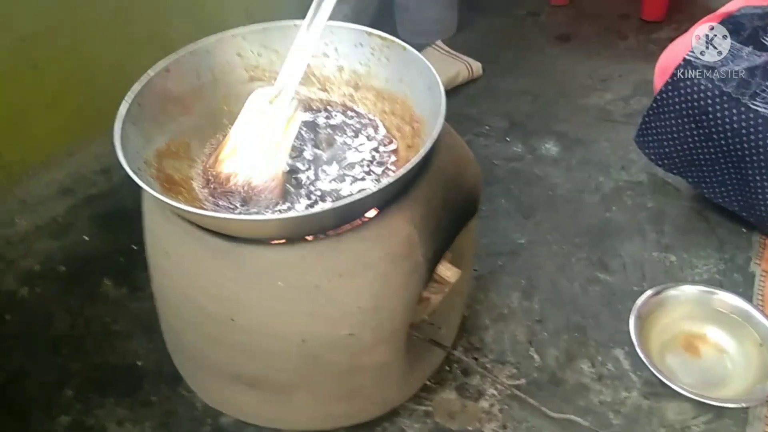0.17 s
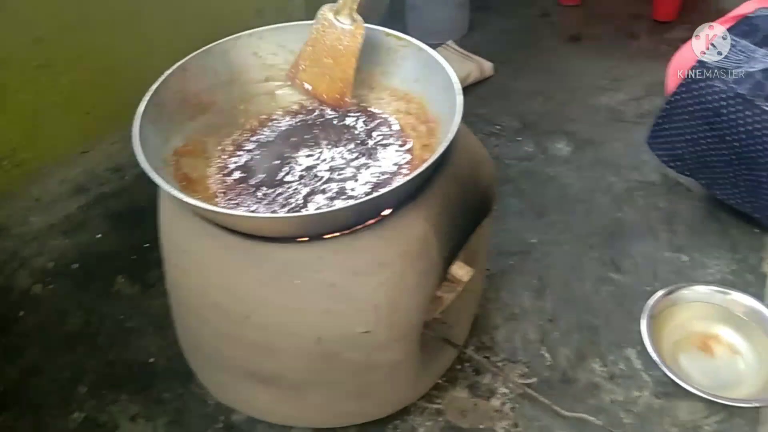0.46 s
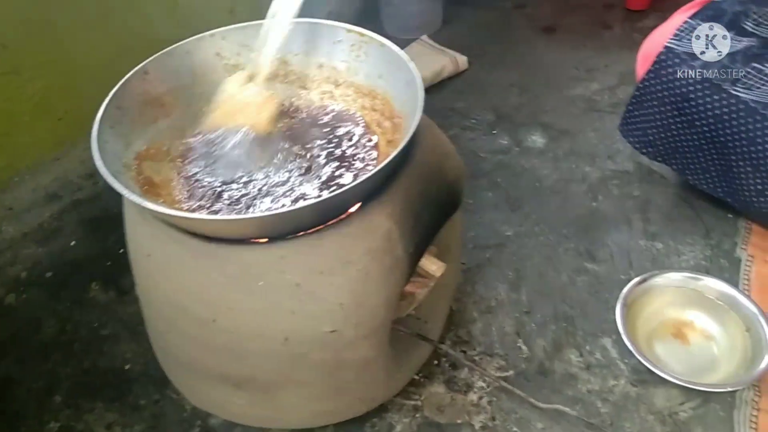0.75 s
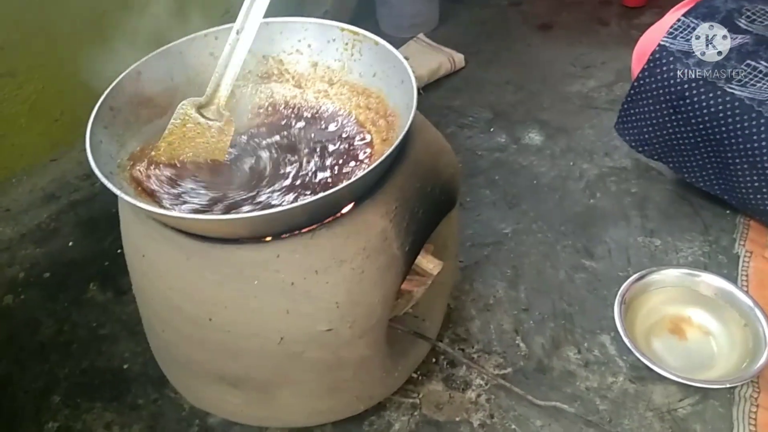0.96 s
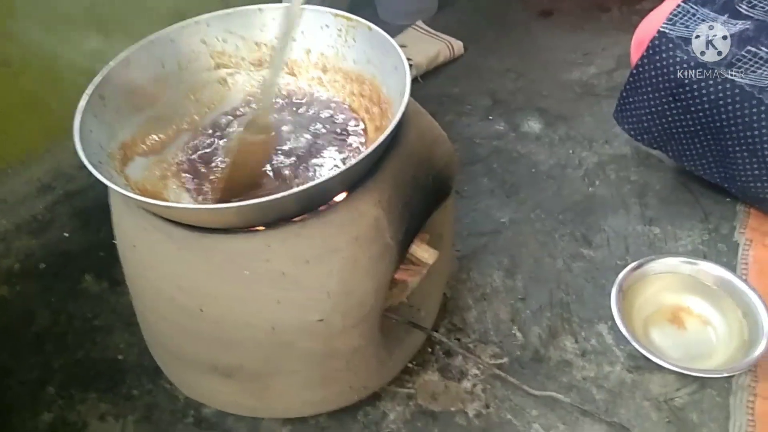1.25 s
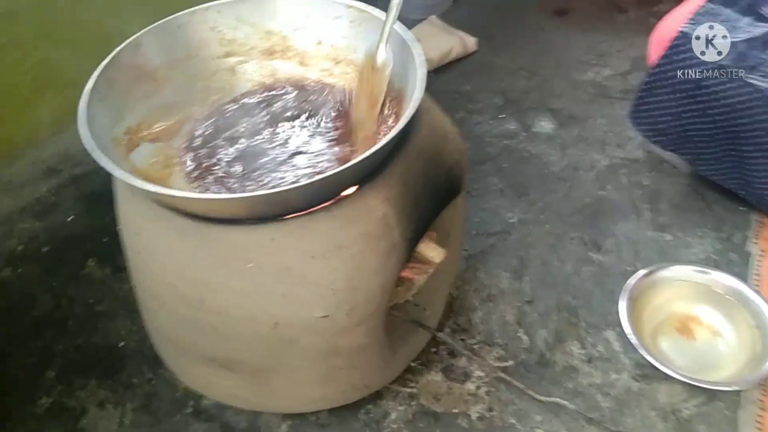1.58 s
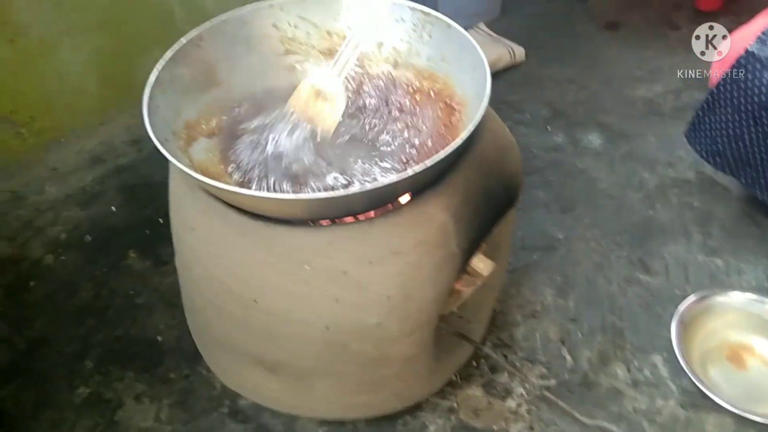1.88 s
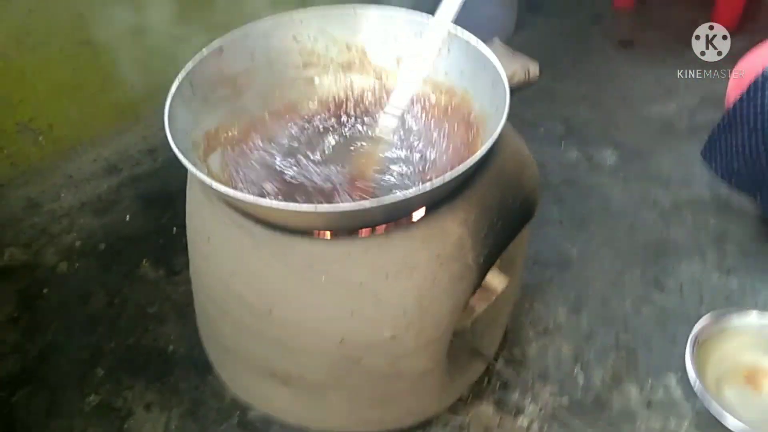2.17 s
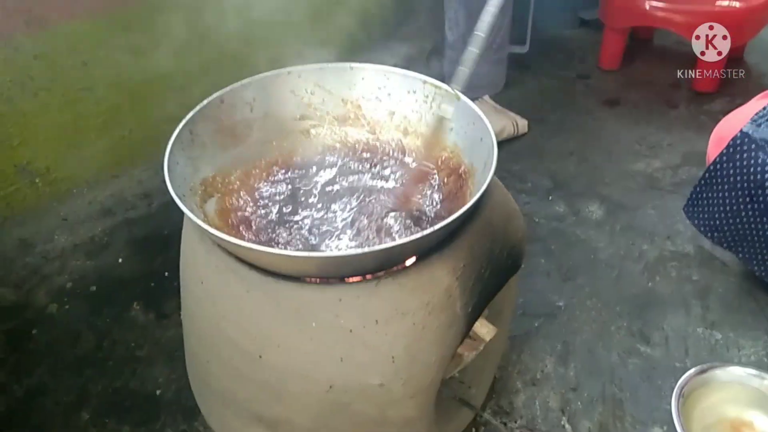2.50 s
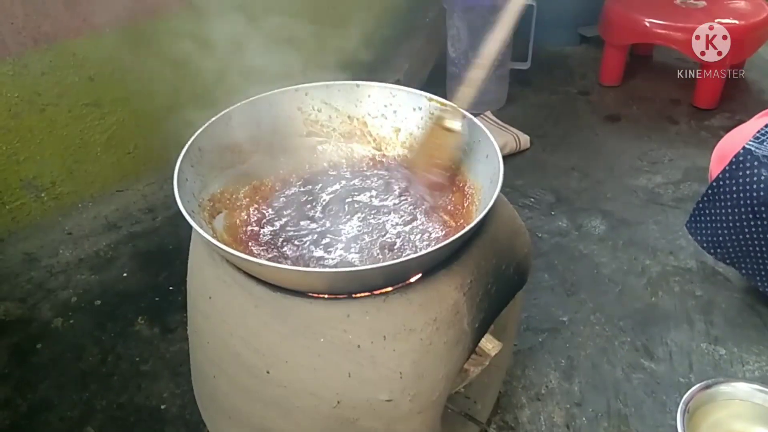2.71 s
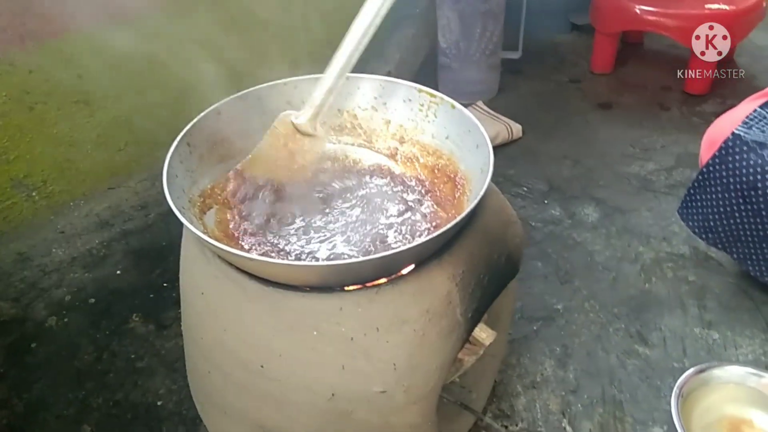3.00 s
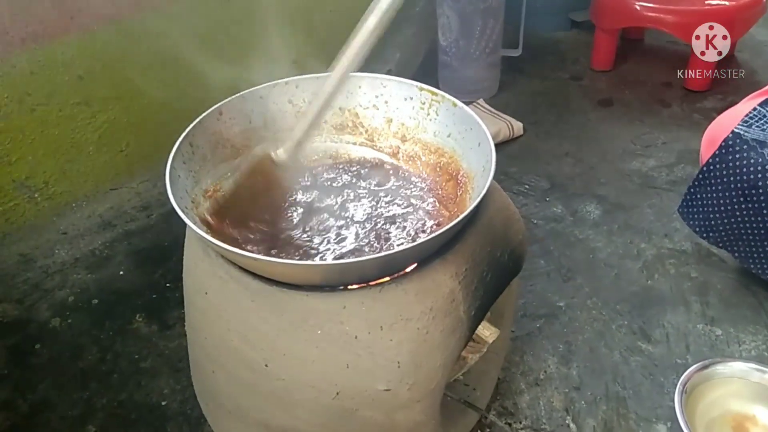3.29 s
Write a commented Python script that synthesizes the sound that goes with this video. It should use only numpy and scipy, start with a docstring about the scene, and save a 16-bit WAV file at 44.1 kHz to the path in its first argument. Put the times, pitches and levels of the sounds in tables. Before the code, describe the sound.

A steel spatula scrapes a metal pan in uneven bright strokes, with sharp taps and short squeaks, a brief pause, then harder clanking scrapes; faint bubbling and fizz, close microphone, short yard echo.

```python
"""Stirring syrup in a metal pan

A long steel spatula stirs boiling syrup in a pan on a clay wood stove in a yard. Its edge sticks and slips:
random clicks ring the blade, the pan and its hollow, with gliding squeaks, sharp taps, knocks and ringing tones.
Bubbles are short rising tones over a noise fizz, and a filtered noise tail makes the yard's echo.
Behind them are swells of low noise as a rumble, wavering tones as a far-off hum, and soft noise as still air."""
import sys
import numpy as np
from scipy import signal
from scipy.fft import rfft, irfft, next_fast_len
from scipy.io import wavfile
from scipy.ndimage import map_coordinates

SR = 44100
rng = np.random.default_rng(int(sys.argv[2]) if len(sys.argv) > 2 else 0)


def inscribe(sig):
    """Save sig as 16-bit PCM at rate SR to the path in sys.argv[1].

    A 1-D sig is mono; a 2-D sig holds one channel per row.
    Samples are clipped to [-1, 1] before scaling.
    """
    pcm = np.round(np.clip(np.atleast_2d(sig).T, -1, 1) * 32767)
    wavfile.write(sys.argv[1], SR, pcm.astype(np.int16))


N = 152145  # length of the scene in samples

# Tones the steel blade rings at. Each row: pitch in Hz, width in Hz (wider dies faster), strength in dB.
BLADE_MODES = [(5813, 33, -10), (6194, 220, -8), (6667, 140, -5.5), (7050, 79, -6), (7437, 105, 1),
               (7795, 114, -5), (8107, 174, -1), (8510, 136, -6), (8940, 590, -14.5), (9800, 1360, -20),
               (11010, 660, -21.5), (12430, 500, -24), (14000, 2300, -29.5)]
BLADE_LOW_HZ, PAN_LOW_HZ = 6300, 1177  # each body radiates little below this
BLADE_DRIFT = 0.008  # random detuning of each tone, as a share of its pitch


def amp(db):
    """Turn decibels into a gain."""
    return 10 ** (np.asarray(db) / 20)


def unit(x):
    """Scale a sound to an rms (average strength) of 1."""
    return x / np.sqrt(np.mean(x ** 2) + 1e-20)


def along(points, hz):
    """Read a curve of (Hz, value) points at the given pitches, on a log pitch axis."""
    point_hz, value = np.transpose(points)
    return np.interp(np.log(hz + 1), np.log(point_hz + 1), value)


def level(rows):
    """Turn (seconds, dB) rows into a gain per sample, practically silent outside them."""
    s, db = np.transpose(rows)
    return amp(np.interp(np.arange(N) / SR, s, db, left=-120, right=-120))


def wobble(rate, size=N):
    """Make a smooth random curve through `rate` random points a second."""
    knots = rng.standard_normal(2048)
    return map_coordinates(knots, [np.arange(size) * rate / SR], mode="wrap")


def filtered(x, response):
    """Multiply the spectrum of x by a gain that depends on frequency."""
    size = next_fast_len(N + SR // 2)  # spare room at the end
    spectrum = rfft(x, size) * response(np.fft.rfftfreq(size, 1 / SR))
    return irfft(spectrum, size)[:N]


def noise(tone):
    """Make noise of rms 1, coloured by (Hz, dB) points."""
    return unit(filtered(rng.standard_normal(N), lambda hz: amp(along(tone, hz))))


def add(out, s, x):
    """Mix x into out, starting at s seconds."""
    i = max(0, round(s * SR))
    out[i:i + len(x)] += x[:max(0, len(out) - i)]


def slips():
    """The edge sticks and lets go: irregular clicks of either sign, stronger and weaker in clumps."""
    slips_per_s, slip_spread_db = 3000, 2.5
    chatter_db, chatter_per_s = 2, 220
    happens = rng.random(N) < slips_per_s / SR
    size = np.minimum(rng.standard_normal(N), 2)
    push = rng.choice([-1, 1], N)
    train = happens * push * amp(slip_spread_db * size)
    return unit(train * amp(chatter_db * wobble(chatter_per_s)))


def ring(modes, drift, low_hz):
    """A body's answer to one click at one point of contact: a sum of dying tones, with energy 1."""
    mode_scatter_db = 3
    mode_rise = 5.3  # a tone builds up this many times faster than it dies
    gentle_hz = 10850  # every body's ring grows gentler above this
    hz, width, db = np.transpose(modes)[:, :, None]
    t = np.arange(SR // 20) / SR
    # Each point of contact excites the tones a little differently
    detune, scatter, side = rng.standard_normal((3, len(modes), 1))
    size = np.sign(side) * width * amp(db + mode_scatter_db * scatter)
    age = np.pi * np.abs(width) * t
    envelope = np.exp(-age) * (1 - np.exp(-mode_rise * age))
    tones = np.sin(2 * np.pi * hz * (1 + drift * detune) * t)
    answer = np.sum(size * envelope * tones, axis=0)
    answer = signal.sosfilt(signal.butter(8, low_hz, "high", fs=SR, output="sos"), answer)
    answer = signal.sosfilt(signal.butter(1, gentle_hz, fs=SR, output="sos"), answer)
    return answer / np.linalg.norm(answer)


def rubbed(force, modes, drift, low_hz, count):
    """A body rubbed along a path: about `count` successive points of contact, faded into each other."""
    hop = N // count
    padded = np.pad(force, (hop, 2 * hop))
    window = np.sin(np.pi * np.arange(2 * hop) / (2 * hop))
    out = np.zeros(len(padded))
    for i in range(0, N + hop, hop):
        piece = padded[i:i + 2 * hop] * window
        add(out, i / SR, signal.fftconvolve(piece, ring(modes, drift, low_hz)))
    return out[hop:hop + N]


def scraping():
    """The same slips drive the blade, the pan wall and the pan's hollow, each with its own loudness."""
    # Scraping strokes that rasp the blade, one list per stretch of time.
    # Each row: time in seconds, level in dB before the blade's mix gain.
    rasp = [
        [(0.56, -40), (0.58, -50.5), (0.71, -57), (0.77, -42.5), (0.776, -46.5), (0.864, -31), (0.92, -48.5),
         (1.02, -63.5), (1.05, -79)],
        [(1.05, -71), (1.098, -64), (1.12, -44.5), (1.262, -48.5), (1.278, -41), (1.49, -40.5), (1.79, -32.5),
         (1.936, -37), (2.02, -53)],
        [(2.02, -53), (2.09, -38.5), (2.096, -44), (2.15, -29.5), (2.234, -42.5), (2.25, -57), (2.334, -65),
         (2.356, -113), (2.4, -73)],
        [(2.6, -97), (2.62, -49), (2.648, -42), (2.66, -46), (2.788, -33), (3.012, -36.5), (3.03, -77),
         (3.038, -41), (3.26, -77.5)],
        [(3.26, -73), (3.272, -82), (3.288, -48), (3.32, -58.5), (3.42, -43), (3.44, -59), (3.45, -47)],
    ]
    # Pressure that rings the pan, one list per stretch of time.
    # Each row: time in seconds, level in dB before the pan's mix gain.
    press = [
        [(0.2, -65), (0.226, -86.5), (0.306, -62), (0.514, -71), (0.524, -49.5), (0.68, -77), (0.72, -59),
         (0.746, -57.5), (0.782, -49), (0.798, -58), (0.868, -57.5), (0.994, -113), (1.03, -91)],
        [(1.03, -88), (1.068, -87), (1.102, -78), (1.12, -51.5), (1.342, -59), (1.514, -75.5), (1.784, -50),
         (1.9, -45), (1.972, -64.5), (2.2, -48.5), (2.304, -83), (2.318, -81), (2.4, -114)],
        [(2.6, -73), (2.622, -62), (2.696, -75.5), (2.862, -38.5), (2.948, -43), (3.046, -32), (3.052, -41),
         (3.276, -88.5), (3.288, -94), (3.324, -59), (3.332, -75), (3.356, -65), (3.45, -75)],
    ]
    # Drag through the syrup, heard as a hollow tone.
    # Each row: time in seconds, level in dB before the hollow's mix gain.
    drag = [(0, -75), (.7, -77), (.8, -58), (.85, -51), (.9, -60.5), (1.03, -87), (1.1, -53.5), (1.13, -42),
            (1.19, -50.5), (1.35, -73), (1.53, -68), (1.62, -78), (1.74, -57.5), (1.78, -48), (1.89, -44),
            (2.05, -55), (2.15, -75), (2.78, -75), (2.85, -76), (2.95, -62), (3.0, -43), (3.08, -45.5),
            (3.12, -52), (3.2, -93), (3.28, -83), (3.32, -83), (3.38, -48.5), (3.45, -54)]
    # Tones of the rubbed pan. Each row: pitch in Hz, width in Hz, strength in dB.
    pan_modes = [(1315, 115, -8), (1536, 48, -3.5), (2131, 140, -4), (2396, 82, -4.5), (2664, 83, -9.5),
                 (2987, 58, 0), (3390, 48, -6.5), (3865, 103, -6), (4590, 53, 1.5), (5020, 100, -2),
                 (5694, 195, -0.5)]
    # Tones of the pan's hollow. Each row: pitch in Hz, width in Hz, strength in dB.
    hollow_modes = [(585, 27, -3.5), (676, 60, -4), (795, 52.6, -1.5), (1046, 270, -17.5)]
    blade_mix_db, pan_mix_db, hollow_mix_db = -1, -5, -7.5
    force = slips()
    blade = rubbed(force * level(np.vstack(rasp)), BLADE_MODES, BLADE_DRIFT, BLADE_LOW_HZ, count=22)
    pan = rubbed(force * level(np.vstack(press)), pan_modes, 0.042, PAN_LOW_HZ, count=30)
    hollow = rubbed(force * level(drag), hollow_modes, 0.062, low_hz=535, count=30)
    return amp(blade_mix_db) * blade + amp(pan_mix_db) * pan + amp(hollow_mix_db) * hollow


def squeaks():
    """The edge catches and squeaks or grates: rough tones, narrow or broad, that swell, glide and fade."""
    # Each row: start in seconds, length in seconds, start pitch in Hz, end pitch in Hz,
    # flutter rate in random points a second (faster is broader), level in dB before the swell and fade.
    catches = [(0.039, 0.034, 869, 826, 120, -59), (0.259, 0.17, 1250, 1288, 151, -67),
               (.29, 0.082, 3060, 3530, 598, -62.5), (0.353, 0.065, 4400, 4680, 392, -71),
               (0.419, 0.057, 3730, 3870, 254, -69), (0.677, .07, 2400, 2450, 397, -63),
               (0.761, 0.12, 2157, 1984, 1197, -48), (0.801, 0.078, 766, 731, 98, -54.5),
               (1.043, 0.053, 1525, 1477, 151, -55.5), (1.068, 0.064, 1017, 886, 149, -55),
               (1.101, .11, 1350, 1306, 1002, -48.5), (1.161, .2, 1280, 1292, 131, -56.5),
               (1.159, .16, 3500, 4440, 1300, -55.5), (1.28, 0.12, 2270, 2280, 220, -56),
               (1.49, 0.096, 803, 904, 128, -64.5), (1.586, 0.072, 2274, 2355, 200, -62),
               (1.681, 0.28, 2162, 2083, 251.7, -51), (1.678, .11, 2856, 3150, 248, -58.5),
               (1.75, 0.19, 800, 827, 200, -54.5), (1.758, 0.14, 4030, 3930, 250, -52.5),
               (1.808, 0.1, 1450, 1394, 302, -53.5), (1.929, 0.19, 780, 1264, 197, -60.5),
               (2.01, 0.072, 1314, 1610, 350, -62), (2.074, 0.12, 2260, 2340, 304, -59.5),
               (2.646, 0.097, 907, 810, 117, -62), (2.972, 0.052, 562, 632, 193, -45.5),
               (3.311, 0.037, 661, 676, 101, -51), (3.337, 0.094, 690, 672, 171, -54),
               (3.384, 0.062, 4570, 4550, 202, -65.5)]
    roughness = 1.4
    out = np.zeros(N)
    for s, length, start_hz, end_hz, width, db in catches:
        n = int(length * SR)
        phase = 2 * np.pi * np.cumsum(np.linspace(start_hz, end_hz, n)) / SR
        # A complex flutter shakes both loudness and phase
        flutter = 1 + roughness * (wobble(width, n) + 1j * wobble(width, n))
        tone = unit(np.real(flutter * np.exp(1j * phase)))
        swell = np.sin(np.pi * np.arange(n) / n)
        add(out, s, amp(db) * tone * swell)
    return out


def taps():
    """The edge strikes and judders: a click and a dying burst of noise ring the blade and the wall."""
    # Sharp contacts. Each row: time in seconds, blade level in dB, pan wall level in dB.
    contacts = [(0.5252, -24.5, -33.5), (0.547, -39, -53), (1.008, -55, -92), (1.119, -41, -80),
                (1.282, -34, -57), (1.771, -34.5, -47), (1.884, -34.5, -68), (2.6196, -39, -52.5),
                (2.6423, -37.5, -52), (2.8962, -31, -42), (3.039, -25, -33.5), (3.076, -30.5, -43),
                (3.1485, -46.5, -81)]
    # Tones of the struck pan wall. Each row: pitch in Hz, width in Hz, strength in dB.
    wall_modes = [(2030, 40, -10), (2360, 30, 2.5), (2827, 99, 3.5), (4340, 88, -4.5), (4933, 300, -3),
                  (5490, 240, -12)]
    t60_s = 0.012  # time to fall by 60 dB
    tail_db, tail_t60_s = -5, 0.053
    out, t = np.zeros(N), np.arange(SR // 4) / SR
    for s, blade_db, wall_db in contacts:
        fade = amp(-60 * t / t60_s) + amp(tail_db - 60 * t / tail_t60_s)
        judder = rng.standard_normal(len(t)) * fade
        judder[0] += 14  # the first click
        bodies = ((BLADE_MODES, blade_db, BLADE_LOW_HZ), (wall_modes, wall_db, PAN_LOW_HZ))
        for modes, db, low_hz in bodies:
            x = signal.fftconvolve(judder, ring(modes, BLADE_DRIFT, low_hz))
            add(out, s, amp(db) * x / np.std(x[:SR // 200]))  # level set over the first 5 ms
    return out


def knocks():
    """Knocks and ringing tones of the pan: a tone and a band of noise around it die together."""
    # Low and high, short and long.
    # Each row: time in seconds, level in dB before scaling by the fade's spread, pitch in Hz,
    # time to fall by 60 dB in seconds, spread of the modes as a share of the pitch.
    pan_knocks = [(.527, -54, 608, 0.14, 0.11), (.527, -53, 2342, 0.34, 0.0065),
                  (0.528, -48, 2910, 0.26, 0.0087), (0.779, -19, 2140, 0.009, 0.11),
                  (1.119, -38, 684, 0.12, 0.049), (1.122, -45, 1720, 0.13, .05),
                  (2.317, -42.5, 4100, 0.031, 0.047), (2.406, -53, 727, .06, 0.053),
                  (2.621, -49.5, 594, 0.066, 0.054), (2.812, -57, 557, 0.12, 0.055),
                  (2.853, -50, 606, 0.069, 0.05), (3.015, -26, 4600, 0.021, .06),
                  (3.04, -32.5, 628, 0.1, 0.092), (3.043, -37, 420, 0.15, 0.032),
                  (3.286, -34.5, 676.6, .11, .03), (3.286, -56, 1380, 0.21, 0.023),
                  (3.332, -39, 2416, 0.049, 0.028), (3.332, -58, 4140, 0.21, 0.02)]
    rise_s = 0.0015
    out, t = np.zeros(N), np.arange(SR // 4) / SR
    for s, db, hz, t60, spread in pan_knocks:
        edges_hz = hz * np.exp(np.array([-2, 2]) * abs(spread))
        band = signal.butter(2, edges_hz, "band", fs=SR, output="sos")
        # The first half lets the filter settle and is thrown away
        cluster = unit(signal.sosfilt(band, rng.standard_normal(2 * len(t)))[len(t):])
        fade = amp(-60 * t / t60) * (1 - np.exp(-t / rise_s))
        knock = (np.sin(2 * np.pi * hz * t) + 1.04 * cluster) * fade
        add(out, s, amp(db) * unit(knock) * np.std(fade))
    return out


def bubbles():
    """Small bubbles burst at random times, each a short tone with a slight rise in pitch."""
    bubbles_per_s, middle_hz = 120, 1500
    quietest_db, range_db = -75, 22
    cycles = 55  # swings of the tone before it has fallen by 60 dB
    out, t = np.zeros(N), np.arange(SR // 16) / SR
    for when, pitch, size in rng.random((int(bubbles_per_s * N / SR), 3)):
        hz = middle_hz * 2.6 ** (2 * pitch - 1)
        age = t * hz / cycles
        tone = np.sin(2 * np.pi * hz * t * (1 + 0.016 * np.minimum(age, 1)))
        fade = amp(-60 * age) * (1 - np.exp(-0.3 * t * hz))
        add(out, when * N / SR, amp(quietest_db + range_db * size ** 2) * tone * fade)
    return out


def fizz():
    """The syrup's fine fizz: high noise whose loudness flickers quickly."""
    # Loudness of the fizz. Each row: time in seconds, level in dB.
    fizz_level = [(0, -65.5), (.2, -69.5), (.28, -78), (.45, -74), (.6, -66), (1.5, -85), (2.3, -82),
                  (2.4, -86), (2.58, -93), (2.7, -75), (3.45, -74)]
    # Colour of the fizz. Each row: frequency in Hz, relative level in dB.
    fizz_tone = [(3000, -35), (8800, -11), (9700, -5.5), (10800, -2), (13000, -6), (16000, -11.5)]
    flicker = amp(3.3 * wobble(560))
    return level(fizz_level) * unit(noise(fizz_tone) * flicker)


def yard(x):
    """A short echo from walls and paved ground: a noise tail that dies at its own rate in each band."""
    # Each row: frequency in Hz, time for the echo to fall by 60 dB in seconds.
    echo_t60 = [(200, 0.22), (2000, 0.28), (8000, .22), (15000, 0.28)]
    hz, t, bands = signal.stft(rng.standard_normal(SR // 2), SR, nperseg=256)
    fade = amp(-60 * t / along(echo_t60, hz)[:, None])
    tail = signal.istft(bands * fade, SR, nperseg=256)[1]
    late = np.pad(x, (SR // 200, 0))  # the echo starts 5 ms late
    return signal.fftconvolve(late, tail / np.linalg.norm(tail))[:N]


def rumble():
    """A low rumble that comes and goes: deep noise in swells, with its lowest part removed."""
    # Swells. Each row: time in seconds, level in dB before the low cut.
    swells = [(0, -36), (.1, -50), (.17, -56), (.25, -47.5), (.29, -40.5), (.34, -55), (1.05, -60),
              (1.14, -37.5), (1.37, -45), (1.46, -58.5), (1.69, -48), (1.95, -50.5), (2.1, -36),
              (2.24, -41), (2.37, -57.5), (2.59, -66), (2.69, -53), (2.9, -61.5), (3.45, -64.5)]
    # Colour of the rumble. Each row: frequency in Hz, relative level in dB before the low cut.
    rumble_tone = [(20, -36), (32, 16), (46, -28.5), (57, 3), (70, -15.5), (102, -1.5), (135, -17.5),
                   (157, -9), (200, -30), (300, -51.5), (600, -71)]
    low_hz = 42.6
    return filtered(level(swells) * noise(rumble_tone), lambda hz: (1 - np.exp(-(hz / low_hz) ** 4)) ** 2)


def distant_hum():
    """Something hums far off: steady tones that waver slowly in loudness and phase."""
    # Each row: pitch in Hz, middle level in dB.
    hum_tones = [(180, -68.5), (364, -79), (409, -81.5)]
    waver_db, waver_radians = 1.9, 1.18
    t, out = np.arange(N) / SR, np.zeros(N)
    for hz, db in hum_tones:
        gain = amp(db + waver_db * wobble(6.29)) * np.sqrt(2)  # root 2 makes it an rms level
        out += gain * np.sin(2 * np.pi * hz * t + waver_radians * wobble(3.95))
    return out


def still_air():
    """Still air: soft, steady coloured noise."""
    # Each row: frequency in Hz, relative level in dB.
    air_tone = [(150, -5), (200, 0), (264, -8), (400, -5.5), (550, -15), (820, -23), (1300, -14),
                (2500, -23), (6000, -22), (10800, -28.5), (16000, -21.5)]
    return amp(-69) * noise(air_tone)


def scene():
    """Add up the pan, its echo and the background."""
    pan = scraping() + squeaks() + taps() + knocks() + bubbles() + fizz()
    echo = amp(-9) * yard(pan)
    background = rumble() + distant_hum() + still_air()
    return (pan + echo + background)[None]


def record(dry):
    """Keep nothing above the band limit."""
    top_hz = 15700
    return filtered(dry[0], lambda hz: hz < top_hz)[None]


dry = scene()
out = record(dry)
inscribe(out)
```